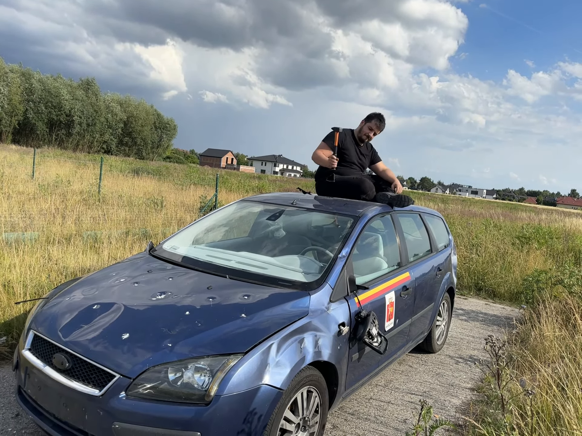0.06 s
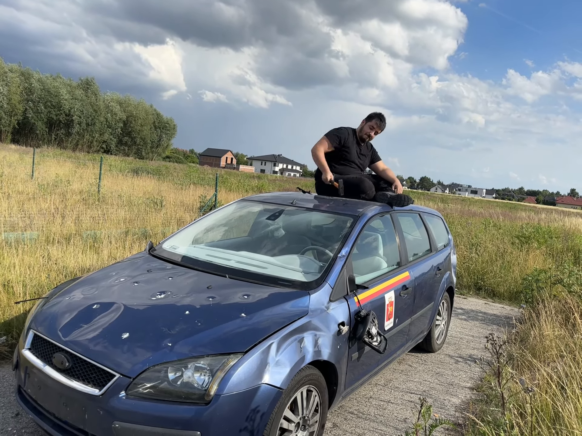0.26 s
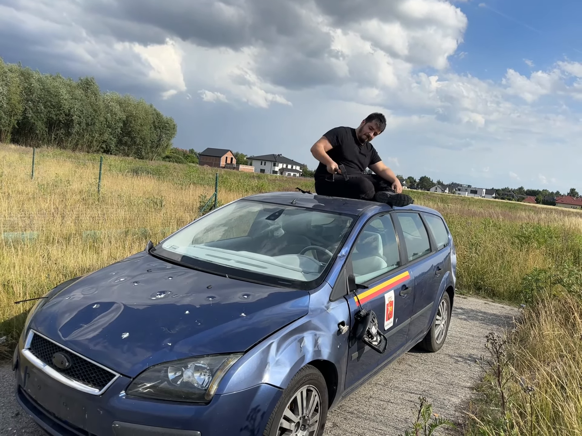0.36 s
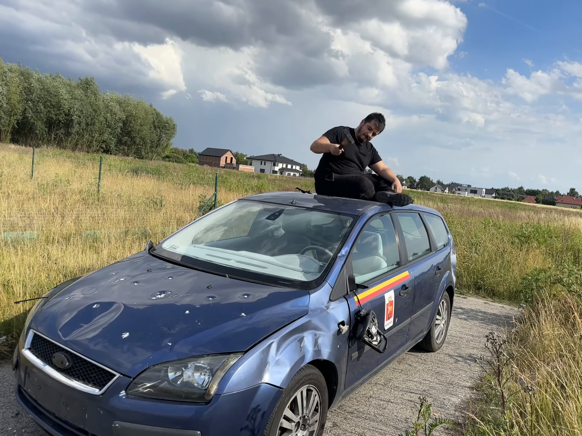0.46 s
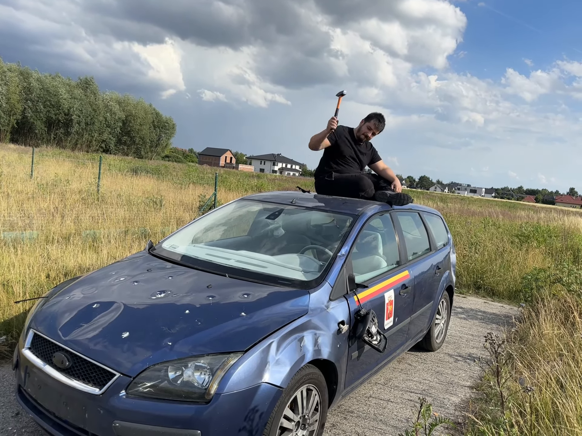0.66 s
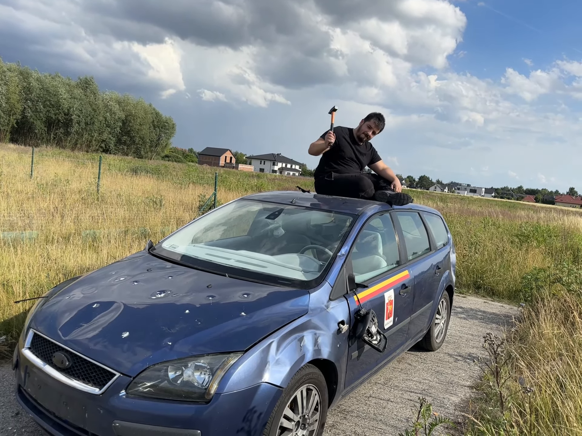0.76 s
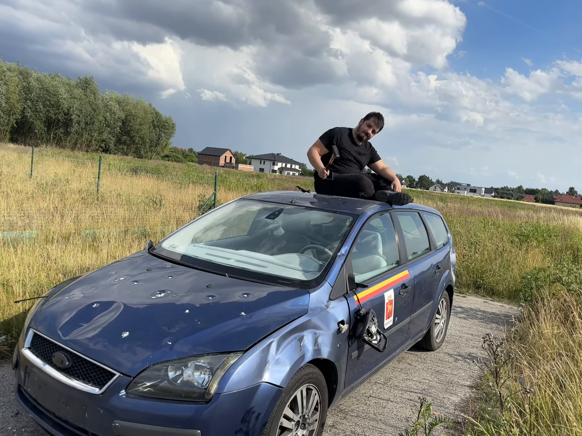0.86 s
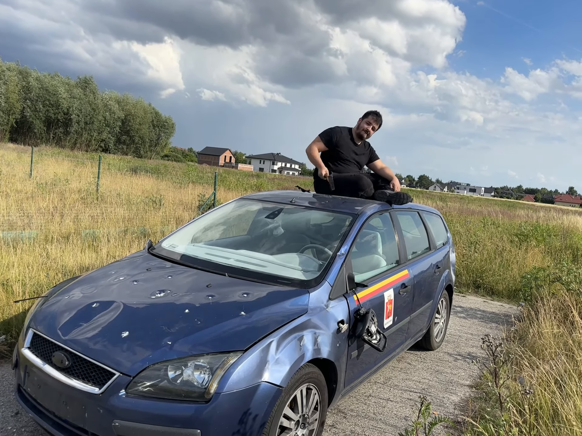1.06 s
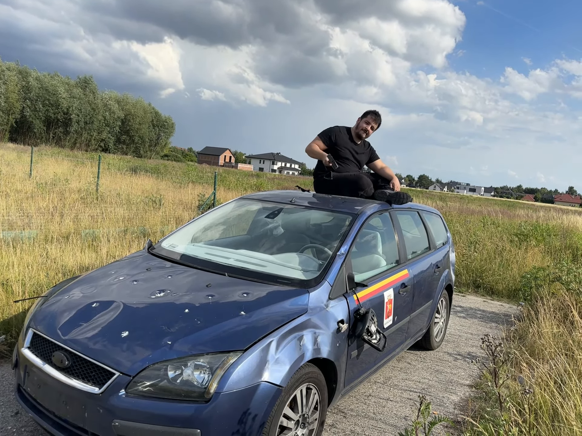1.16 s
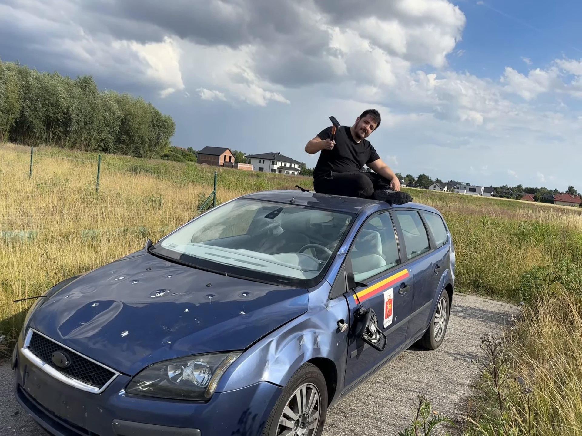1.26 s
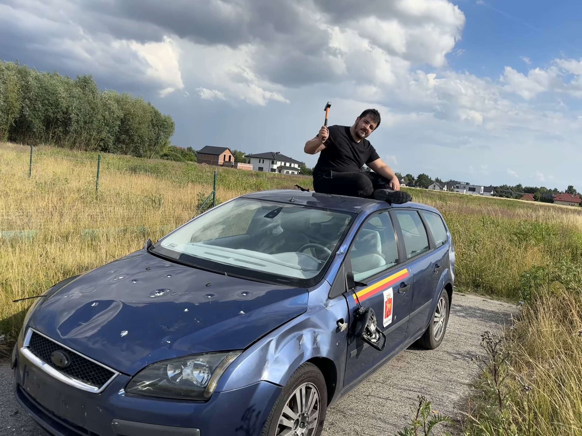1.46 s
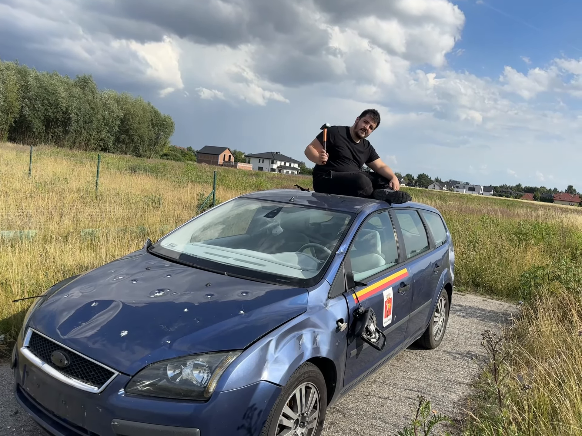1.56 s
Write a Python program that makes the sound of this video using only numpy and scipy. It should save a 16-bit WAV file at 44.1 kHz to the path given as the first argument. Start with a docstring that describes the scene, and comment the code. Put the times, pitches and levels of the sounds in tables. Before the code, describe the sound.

Two hard hammer hits land on the sheet-metal roof of a car in an open field, each with a short metallic ring and a rattle of trim. Soft wind in the grass and a slight microphone rumble lie behind.

```python
"""A hammer comes down twice on the sheet-steel roof of a car in an open field.
Each blow is a crack of noise and a pulse that slides down in pitch as it spreads through the sheet.
Fading noise makes the body shudder, wobbling sine tones make the roof ring,
smaller pulses are the roof slapping back, and short noise bursts are loose trim ticking.
Behind it, coloured noise makes wind in the grass and on the microphone, with a thin far whine;
this background is quieter after each blow."""
import sys
import numpy as np
from scipy import signal
from scipy.fft import rfft, irfft
from scipy.io import wavfile
from scipy.ndimage import uniform_filter1d, minimum_filter1d, map_coordinates

SR = 44100
rng = np.random.default_rng(int(sys.argv[2]) if len(sys.argv) > 2 else 0)


def int16_out(signal):
    """Quantize to a 16-bit WAV file."""
    q = np.round(np.clip(np.atleast_2d(signal).T, -1, 1) * 32767)
    wavfile.write(sys.argv[1], SR, q.astype(np.int16))


N = 70560  # samples: 1.6 s


def amp(db):
    """Turn decibels into a gain."""
    return 10 ** (np.asarray(db) / 20)


def unit(x):
    """Scale a sound to rms 1."""
    return x / np.sqrt(np.mean(x ** 2) + 1e-20)


def along(points, hz):
    """Read a curve of (f/Hz, value) points, with frequency on a log axis."""
    f, v = np.transpose(points)
    return np.interp(np.log(hz + 1), np.log(f + 1), v)


def bump(hz, centre_hz, octaves):
    """A bell of height 1 on a log-frequency axis."""
    return np.exp(-(np.log2((hz + 1) / centre_hz) / octaves) ** 2)


def since(s):
    """Seconds since time s, zero before it."""
    return np.maximum(np.arange(N) / SR - s, 0)


def wobble(rate):
    """A smooth random curve through `rate` random points a second."""
    points = rng.standard_normal(N // 20)
    return map_coordinates(points, [np.arange(N) * rate / SR], mode="mirror")


def filtered(x, response):
    """Multiply the spectrum of x by a response to frequency; zero padding limits wrap-around."""
    hz = np.fft.rfftfreq(2 * N, 1 / SR)
    return irfft(rfft(x, 2 * N) * response(hz))[:N]


def noise(spectrum):
    """Random noise coloured by (f/Hz, level/dB) points, at rms 1."""
    white = rng.standard_normal(N)
    return unit(filtered(white, lambda hz: amp(along(spectrum, hz))))


def envelope(s, attack, hold, t60):
    """Rise at time s, hold, then fade by 60 dB in every t60 seconds."""
    rise = 1 - np.exp(-since(s) / attack)
    fade = np.exp(-np.log(1000) * since(s + hold) / t60)
    return rise * fade


def causal(gain):
    """The response with these gains that never sounds before its cause (minimum phase)."""
    cepstrum = irfft(np.log(np.maximum(gain, 1e-6)))
    # fold the backward-in-time half onto the forward half
    cepstrum[1:N] *= 2
    cepstrum[N + 1:] = 0
    return np.exp(rfft(cepstrum))


def bending_wave(s, colour_db, bend):
    """A pulse of energy 1 spread by the sheet: bending waves carry treble fast and bass slowly."""
    hz = np.fft.rfftfreq(2 * N, 1 / SR)
    pulse = causal(amp(colour_db(hz)))
    # this phase delays each frequency by s + bend / sqrt(hz) seconds
    delay = np.exp(-2j * np.pi * (hz * s + 2 * bend * np.sqrt(hz)))
    wave = irfft(pulse * delay)[:N]
    return wave / np.linalg.norm(wave)


# the hammer blows, one for each spot struck:
# t/s, level/dB, shudder level/dB, shudder hold/s, ring level/dB, multiple of the usual fade time
HAMMER_BLOWS = [(0.211, -2, 1, 0.079, -3.5, 1), (.9608, -1, -1.5, 0.076, -4.5, .95)]
# colour of the bending wave: f/Hz, level/dB at first spot, level/dB at second spot
WAVE_COLOUR = [(25.4, -11, -41), (55, -4.5, 1.5), (162, 6.5, 8), (300.5, 3, 1.5), (553, -15, -9.5),
               (700, -10, 9.5), (880, 9.5, 1), (1000, -11, 0), (1590, -17, 1.5), (1620, -8, -20),
               (2120, -7.5, -16.5), (2754, -14.5, -14), (3800, -35, -22.5), (5000, -23.5, -41),
               (7840, -34, -46), (10200, -47, -26.5), (12000, -31, -50), (15400, -35.5, -25),
               (16500, -42, -42)]
# colour of the crack of steel on steel: f/Hz, level/dB
CRACK_COLOUR = [(300, -15), (1500, 7.5), (2800, 6), (4500, -4), (7500, -20.5), (10500, -16.5),
                (12200, -18.5), (15000, -10), (16500, -13.5)]
BEND_S_ROOT_HZ = 0.13  # a bending wave arrives this over the root of its frequency late
WAVE_DB, CRACK_DB = 17.5, -15
CRACK_T60_S, CRACK_TAIL_DB, CRACK_TAIL_T60_S = 0.015, -10, 0.085  # tail level is relative to the snap


def hammer():
    """Steel meets steel: a snap with a short crackle, and a bending wave that falls in pitch."""
    out = np.zeros(N)
    for spot, (s, db, *_) in enumerate(HAMMER_BLOWS):
        colour = [(hz, levels[spot]) for hz, *levels in WAVE_COLOUR]
        wave = bending_wave(s, lambda hz: along(colour, hz), BEND_S_ROOT_HZ)
        front = s + BEND_S_ROOT_HZ / np.sqrt(6500)  # when the wave's 6500 Hz part arrives
        snap = envelope(front, 0.00007, 0.0008, CRACK_T60_S)
        tail = amp(CRACK_TAIL_DB) * envelope(front, 0.0015, 0.00095, CRACK_TAIL_T60_S)
        crack = (snap + tail) * noise(CRACK_COLOUR)
        out += amp(db) * (amp(WAVE_DB) * wave + amp(CRACK_DB) * crack)
    return out


# colour of the shuddering body: f/Hz, level/dB
SHUDDER_COLOUR = [(25, -27), (60, -1), (130, -1), (250, -3.5), (450, 2.5), (680, -2.5), (1200, -1),
                  (1650, -6.5), (2300, -15.5), (3200, -30.5), (5000, -43.5), (7500, -54), (15500, -68)]
# how long each part of the shudder takes to fade by 60 dB: f/Hz, fade time/s
SHUDDER_FADE = [(60, 0.33), (300, 0.35), (550, .2), (900, 0.12), (1600, 0.045), (4000, 0.068),
                (12000, 0.38)]
SHUDDER_DB = -19


def shudder(slack_db=-4, slack_s=0.018):
    """Criss-crossing waves as dense noise that slackens between blow and rebound; each band has its own fade."""
    out = np.zeros(N)
    for s, _, db, hold, _, decay in HAMMER_BLOWS:
        dip = np.exp(-((since(s) - hold / 2) / slack_s) ** 2)
        dense = noise(SHUDDER_COLOUR) * amp(slack_db * dip)
        # split into overlapping bands that add back up to the whole
        for (centre, t60), own in zip(SHUDDER_FADE, np.eye(len(SHUDDER_FADE))):
            share = [(f, w) for (f, _), w in zip(SHUDDER_FADE, own)]
            band = filtered(dense, lambda hz: along(share, hz))
            arrival = s + BEND_S_ROOT_HZ / np.sqrt(centre)
            out += amp(SHUDDER_DB + db) * band * envelope(arrival, 0.0013, hold, decay * t60)
    return out


# roof modes (the tones it can ring at); each spot struck stirs them differently:
# f/Hz, level/dB at first spot, level/dB at second spot, time to fade by 60 dB/s
ROOF_MODES = [(193.5, -27, -26, 0.18), (310.5, -20, -31, 0.32), (335.5, -30, -20.5, 0.31),
              (387, -27, -31, 0.31), (448, -33.5, -28.5, 0.35), (474.7, -24, -39, 0.35),
              (556.7, -29, -23.5, 0.17), (714, -26.5, -36, 0.25), (835, -26, -38, .16),
              (962, -27.5, -28, .14), (1040, -33, -33.5, 0.19), (1098, -31, -28.5, 0.081),
              (1194, -24.5, -37, 0.072), (1225, -30, -31, 0.11), (1447, -28, -33, 0.1),
              (1950, -33, -33.5, 0.058)]
MODE_ATTACK_S = 0.014  # the modes build up as the wave fills the roof


def ring(rough=0.49, rough_rate=45):
    """The roof's modes as fading sine tones, their phase unsteady while the sheet flexes."""
    out = np.zeros(N)
    for spot, (s, _, _, hold, db, decay) in enumerate(HAMMER_BLOWS):
        for hz, *levels, t60 in ROOF_MODES:
            phase = 2 * np.pi * (hz * since(s) + rng.random()) + rough * wobble(rough_rate)
            loudness = amp(db + levels[spot]) * envelope(s, MODE_ATTACK_S, hold, decay * t60)
            out += loudness * np.sin(phase)
    return out


# the roof slaps back against its ribs: t/s, level/dB, pitch f/Hz
ROOF_SLAPS = [(0.2228, -4.5, 950), (0.2353, -4, 1520), (0.2404, -13, 603), (.2550, -11, 1270),
              (0.2678, -6.5, 484), (.2710, -12, 1150), (.2790, -1, 1190), (.2900, -5.5, 308),
              (0.9758, -7, 1400), (0.9869, -9.5, 995), (1.0058, -6.5, 1150), (1.0230, -13, 442),
              (1.0293, -8.5, 207), (1.0420, -13, 435), (1.0592, -12, 321)]
# colour shared by all slaps: f/Hz, level/dB
SLAP_COLOUR = [(60, -17), (200, 0), (400, 4.5), (700, -4), (1250, -8.5), (1900, -11), (3000, -32.5),
               (7000, -50.5), (16000, -45)]
SLAP_DB = 13
SLAP_PEAK_DB, SLAP_OCTAVES = 16, 0.22  # each slap rings in one resonance: its height and width


def slap_back(bend=0.1):
    """Dull slaps of the roof: small bending waves, each with one resonance at its own pitch."""
    out = np.zeros(N)
    for s, db, pitch in ROOF_SLAPS:
        def colour_db(hz):
            """Shared slap colour plus this slap's resonance."""
            return along(SLAP_COLOUR, hz) + SLAP_PEAK_DB * bump(hz, pitch, SLAP_OCTAVES)
        out += amp(SLAP_DB + db) * bending_wave(s, colour_db, bend)
    return out


# loose trim ticks: t/s, level/dB
TRIM_TICKS = [(.2312, -12), (.2432, -16), (0.277, -5), (0.28, 2.5), (0.2815, 2.5), (0.286, -6),
              (.2935, -19), (.3064, -23), (.3116, -14), (0.3484, -22.5), (.3686, -23.5), (1.0084, -4.5),
              (1.0140, -9), (1.0184, -11), (1.0312, -6), (1.0326, -7.5), (1.0494, -14.5), (1.069, -23),
              (1.0728, -31), (1.093, -28), (1.1225, -30)]
# colour of ticks and chatter: f/Hz, level/dB
TICK_COLOUR = [(300, -14), (1500, 16), (3500, 11.5), (5500, 5.5), (8000, -7), (11000, -3.5), (15500, -0.5)]
TICK_DB, TICK_T60_S = -26, 0.0086


def loose_trim(chatter_db=-54, chatter_t60=0.25, spiky_db=5):
    """Loose parts knock as the body shakes: sharp ticks and a fine chatter, both from one noise."""
    ticks = sum(amp(TICK_DB + db) * envelope(s, 0.0006, 0.00068, TICK_T60_S) for s, db in TRIM_TICKS)
    shaking = sum(envelope(s, 0.005, hold, chatter_t60) for s, _, _, hold, *_ in HAMMER_BLOWS)
    spikes = unit(amp(spiky_db * wobble(600)))
    chatter = amp(chatter_db) * shaking * spikes
    return (ticks + chatter) * noise(TICK_COLOUR)


# colour of the wind in the grass: f/Hz, level/dB
GRASS_COLOUR = [(30, -16), (140, 5), (205, -0.5), (305, 4), (420, 0.5), (560, -5.5), (705, -2), (850, -6.5),
                (1250, -7.5), (1480, -9), (2100, -17.5), (3500, -29), (5500, -40.5), (8000, -64.5),
                (14500, -51), (16000, -61)]
WHINE_HZ, WHINE_WIDTH_HZ = 1332, 36
WHINE_DB = -10.5  # relative to the grass


def open_air(background_db, flutter_db=0.54):
    """Wind in the grass as gently fluttering noise, and a far whine as a very narrow band of noise."""
    grass = noise(GRASS_COLOUR) * amp(flutter_db * wobble(14.64))
    white = rng.standard_normal(N)
    whine = unit(filtered(white, lambda hz: 1 / (1 + ((hz - WHINE_HZ) / WHINE_WIDTH_HZ) ** 2)))
    return amp(background_db) * (grass + amp(WHINE_DB) * whine)


# gusts that thump the microphone: t/s, added level/dB
WIND_GUSTS = [(.035, 3.5), (.69, 9), (.85, 3), (1.21, 9), (1.372, 10.5), (1.508, 3.5), (1.595, 12.5)]
# colour of the wind's rumble: f/Hz, level/dB
RUMBLE_COLOUR = [(20, -32), (35, -43), (55, -0.5), (75, 3.5), (120, 0), (180, -9.5), (400, -53),
                 (1500, -70)]
# colour of a low rush of wind, strongest before the first blow and fainter when the background is low:
# f/Hz, level/dB
LOW_RUSH_COLOUR = [(50, -19), (130, 1.5), (200, -4.5), (300, 3.5), (420, -12), (700, -27), (2000, -64.5)]
GUST_S = 0.012  # spread of a gust to either side of its peak
RUMBLE_DB, RUMBLE_FOLLOWS = -43.5, 1  # dB of change per dB of background level
LOW_RUSH_DB, LOW_RUSH_GROWS = -43, 2.16  # dB of change per dB of background level


def microphone_wind(background_db, buffet_db=0.34):
    """Wind buffets the microphone: low noise that follows the background level, with gusts in its rumble."""
    gust_db = sum(db * np.exp(-((since(0) - s) / GUST_S) ** 2 / 2) for s, db in WIND_GUSTS)
    rumble_db = RUMBLE_DB + RUMBLE_FOLLOWS * (background_db - background_db.mean())
    rumble = noise(RUMBLE_COLOUR) * amp(rumble_db + gust_db + buffet_db * wobble(16.72))
    rush_db = LOW_RUSH_DB + LOW_RUSH_GROWS * (background_db - background_db.max())
    low_rush = noise(LOW_RUSH_COLOUR) * amp(rush_db)
    return rumble + low_rush


# level of the background over time, lower after each blow; it climbs back before the second:
# t/s, level/dB
BACKGROUND_LEVEL = [(0, -41), (0.191, -41), (.3, -49), (.42, -49.5), (.5, -43.5), (0.779, -43),
                    (0.941, -41.5), (1.08, -49.5), (1.22, -49.5), (1.35, -50), (1.6, -52)]


def field():
    """The background: open air and wind on the microphone, both quieter after each blow."""
    background_db = np.interp(since(0), *np.transpose(BACKGROUND_LEVEL))
    return open_air(background_db) + microphone_wind(background_db)


def scene():
    """The car under the hammer, in open air."""
    car = hammer() + shudder() + ring() + slap_back() + loose_trim()
    return (car + field())[None]


LOW_CUT_HZ, TOP_HZ = 30, 16250  # microphone's low cut, recorder's upper limit
CEILING, LOOK_S = 0.73, 0.0013  # limiter: highest level let through, and length of its gain window


def record(dry):
    """A low cut, a fast limiter that turns down peaks, then the recorder's steep upper limit."""
    low_cut = signal.butter(2, LOW_CUT_HZ, "highpass", fs=SR, output="sos")
    x = signal.sosfilt(low_cut, dry[0])
    size = max(int(LOOK_S * SR), 1)
    needed = CEILING / np.maximum(np.abs(x), CEILING)
    gain = uniform_filter1d(minimum_filter1d(needed, size), size)
    return filtered(x * gain, lambda hz: 1 / (1 + (hz / TOP_HZ) ** 160))[None]


dry = scene()
out = record(dry)
int16_out(out)
```